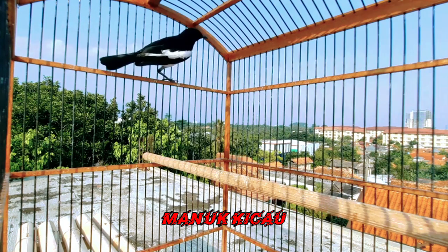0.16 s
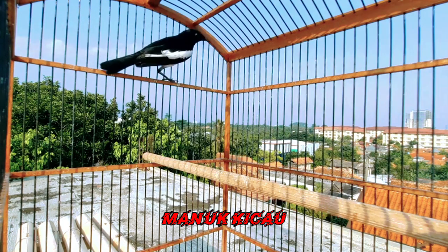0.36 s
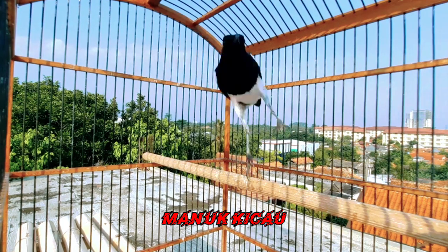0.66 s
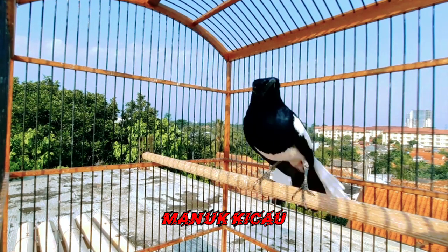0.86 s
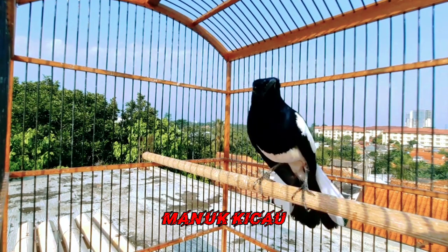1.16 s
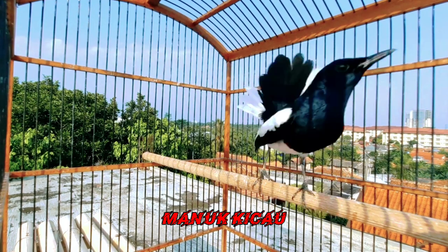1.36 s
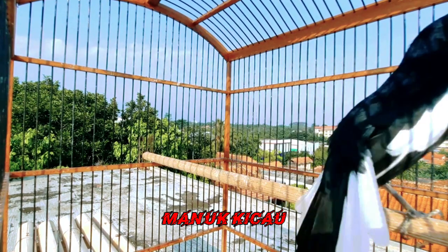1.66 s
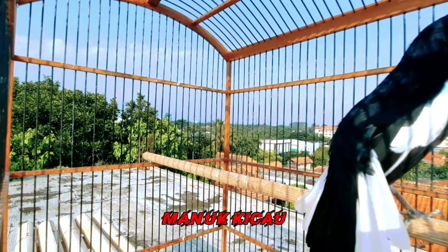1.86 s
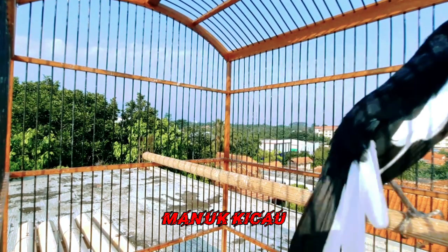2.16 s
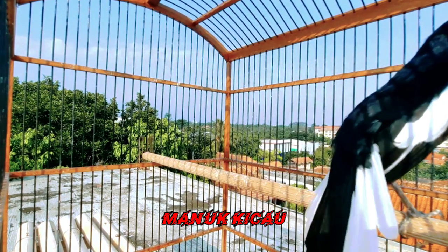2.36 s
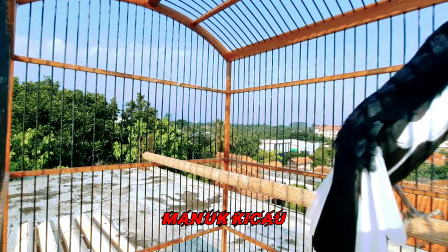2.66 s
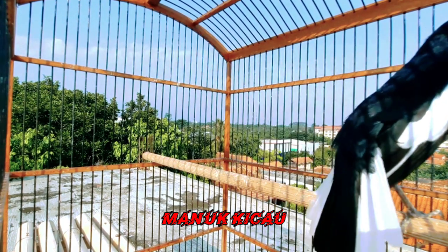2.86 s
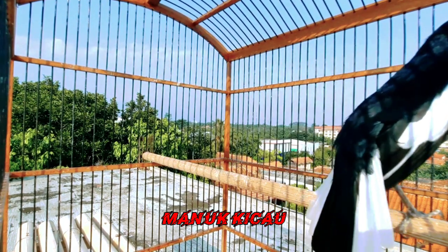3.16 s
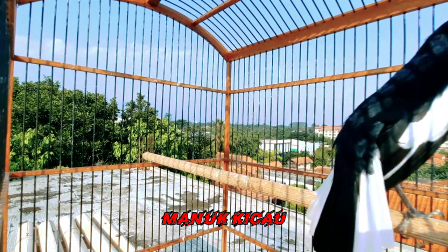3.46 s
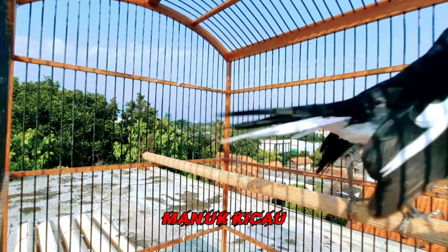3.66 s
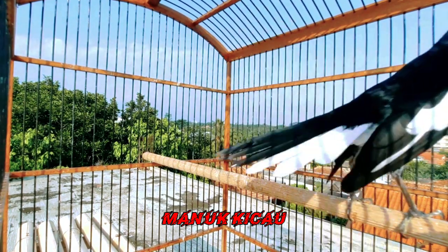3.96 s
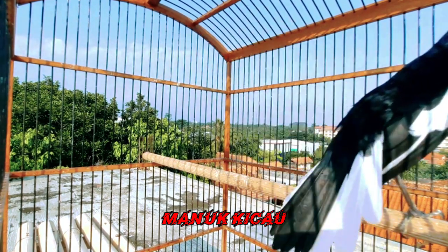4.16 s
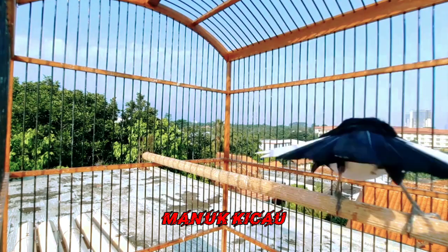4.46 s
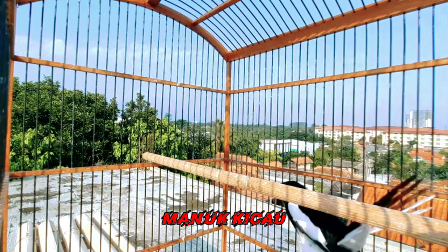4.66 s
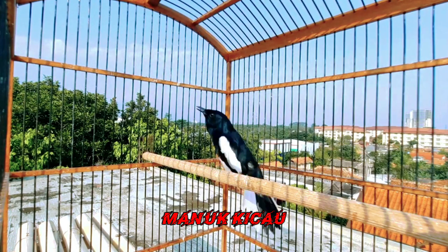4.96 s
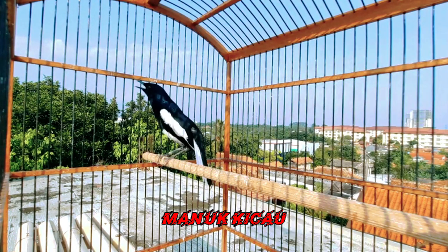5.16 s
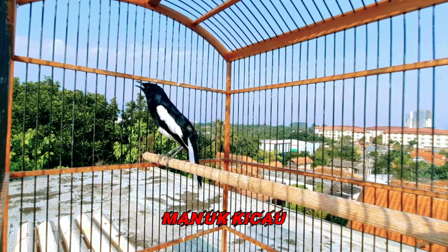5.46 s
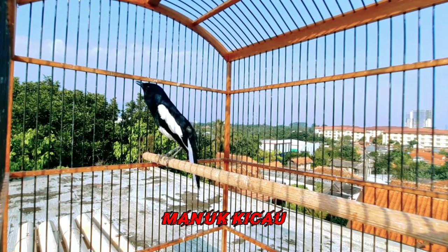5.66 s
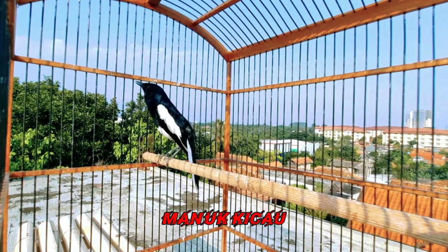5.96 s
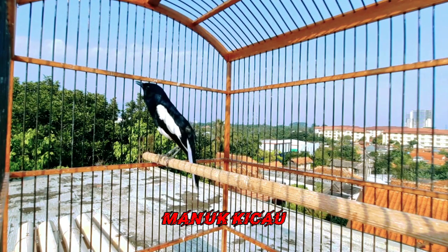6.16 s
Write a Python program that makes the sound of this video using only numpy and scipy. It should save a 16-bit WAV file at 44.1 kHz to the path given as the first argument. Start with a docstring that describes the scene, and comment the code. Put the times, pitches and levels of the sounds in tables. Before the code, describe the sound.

A small songbird in a cage sings very close to a stereo microphone on an open rooftop. A faint warble, dry ticks and wire rattle come first, then a harsh squeal trailing bright hiss and a perch thump. Chips, rasps and warbles follow; wind buffets the right side while distant birds call. Rising whistles lead into more rasps, another hop, twitters and arched whistles over low town rumble.

```python
"""A magpie-robin sings in a cage on a roof, so close that loud notes overload both ports; a town rumbles far off.
It opens with a warble, ticks and landing feet, then a squeal that leaves a hiss, another hop, whistles and rasps.
Warbles follow a first chip; a gust buffets the right port while faint birds call.
Upslurs then lead into rasps, with more chips and a hop, before twitters and a last run of arched whistles.
Song is near-sine tone with jitter and overtones; air is shaped noise; perch, wires and frame are damped modes."""
import sys
import numpy as np
from scipy import signal
from scipy.fft import rfft, irfft, next_fast_len
from scipy.io import wavfile
from scipy.ndimage import uniform_filter1d

SR = 44100
rng = np.random.default_rng(int(sys.argv[2]) if len(sys.argv) > 2 else 0)


def generate_wav(signal):
    """Clip the signal to [-1, 1] and save it as 16-bit WAV at the path in sys.argv[1]."""
    frames = np.transpose(np.atleast_2d(signal))
    scaled = np.clip(frames, -1, 1) * 32767
    pcm = np.round(scaled).astype(np.int16)
    wavfile.write(sys.argv[1], SR, pcm)


N = 278271
TIME = np.arange(N) / SR


def from_db(db):
    """Decibels to gain."""
    return 10 ** (np.asarray(db) / 20)


def unit(x):
    """Scales to an rms of one."""
    return x / np.sqrt(np.mean(x ** 2) + 1e-20)


def follow(rows, t):
    """Reads each column of a curve at the times t."""
    s, *columns = np.transpose(rows)
    return [np.interp(t, s, c) for c in columns]


def add(mix, s, sound):
    """Lays a sound into the mix at s seconds."""
    part = mix[..., max(round(s * SR), 0):][..., :sound.shape[-1]]
    part += sound[..., :part.shape[-1]]


def pan(left_db):
    """Gains of the two ports for a level difference, at equal mean power."""
    gains = from_db([[left_db / 2], [-left_db / 2]])
    return unit(gains)


def noise(spectrum, size=N):
    """Noise of unit rms, shaped by a spectrum of (hz, db) read along log frequency."""
    hz, db = np.transpose(spectrum)
    padded = next_fast_len(size, True)
    f = np.fft.rfftfreq(padded, 1 / SR)
    shape = from_db(np.interp(np.log(f + 1), np.log(hz), db))
    white = rfft(rng.standard_normal(padded))
    return unit(irfft(white * shape, padded)[:size])


def noise_pair(spectrum, shared):
    """Noise at both ports; shared is the part of the power common to both."""
    shared = np.clip(shared, 0, 1)
    common = noise(spectrum)
    separate = np.array([noise(spectrum), noise(spectrum)])
    return np.sqrt(shared) * common + np.sqrt(1 - shared) * separate


def wobble(size, rate_hz):
    """Smooth random drift of unit rms that moves at up to about rate_hz."""
    padded = next_fast_len(size, True)
    f = np.fft.rfftfreq(padded, 1 / SR)
    white = rfft(rng.standard_normal(padded))
    return unit(irfft(white / (1 + (f / rate_hz) ** 4), padded)[:size])


def echoes(x, t60, delay_s):
    """Scattered reflections, different at each port, that die away."""
    t = np.arange(SR // 2) / SR
    hits = rng.random((2, len(t))) < 2000 / SR  # about 2000 reflections a second
    taps = rng.standard_normal((2, len(t))) * hits
    taps *= from_db(-60 * t / t60) * (t > delay_s)
    taps /= np.linalg.norm(taps, axis=1, keepdims=True)
    return signal.fftconvolve(x, taps, axes=1)[:, :N]


def outdoors():
    """A gently swelling town rumble, and low, lumpy wind noise mostly on the right port."""
    # town rumble spectrum: hz, level_db
    town_spectrum = [(20, -26), (70, -3), (110, 0), (170, -7), (310, -7), (600, -28), (3000, -38),
                     (6500, -49), (10000, -72)]
    # wind strength before panning: time_s, level_db
    gust_level = [(0, -70), (1.7, -48), (2.25, -32.5), (2.8, -28), (3.0, -23), (3.36, -21), (3.6, -43.5),
                  (6.3, -44)]
    # wind buffeting spectrum: hz, level_db
    buffet_spectrum = [(25, -39), (55, -11.5), (102, 4), (140, -11), (310, -33), (450, -52), (2000, -110)]
    town_db, town_swell_db = -42, 1.4
    puff_s, puff_db, puff_length_s = 2.269, -11, 0.012  # one sharp puff in the wind

    gust_db, = follow(gust_level, TIME)
    puff = from_db(puff_db) * np.exp(-((TIME - puff_s) / puff_length_s) ** 2)
    strength = from_db(gust_db + 2.6 * wobble(N, 7.7)) + puff
    wind = noise(buffet_spectrum) * strength
    town = noise_pair(town_spectrum, 0.18) * from_db(town_db + town_swell_db * wobble(N, 8.5))
    return pan(-29.0) * wind + pan(1.1) * town


def steps(length):
    """Times through a note, from its start."""
    return np.linspace(0, length, 200)


def envelope(t, attack_s, release_s, depth_db):
    """Attack, hold and release, in dB under the held level."""
    rise = t / max(attack_s, 1e-4)
    fall = (t[-1] - t) / max(release_s, 1e-4)
    return depth_db * (np.minimum(rise, 1) + np.minimum(fall, 1) - 2)


def arch(start, length, first_hz, turn_hz, last_hz, turn_s, level_db, attack_s, release_s, depth_db):
    """Pitch bends to a turning point and away again. Like all notes: rows of (s, Hz, dB)."""
    bend = 1.6  # pitch leaves its turning point with this power of time
    t = steps(length)
    before = np.maximum(1 - t / turn_s, 0)
    after = np.maximum(t - turn_s, 0) / abs(length - turn_s)
    hz = turn_hz + (first_hz - turn_hz) * before ** bend + (last_hz - turn_hz) * after ** bend
    return np.c_[start + t, hz, level_db + envelope(t, attack_s, release_s, depth_db)]


def syllable(rows, lag_ms, jitter, shimmer, flutter_hz, half_db, octave_db, rush_db=None, fall_db=9,
             steady_holds=False, edge_s=.003):
    """The syrinx swings as a near sine; when strained it shakes and doubles its period, which adds half lines."""
    # air rushing through the beak: hz, level_db
    rush_spectrum = [(500, -9), (1500, -11.5), (5500, 1.5), (10000, -12), (15000, -3)]
    t = np.arange(rows[0][0] - edge_s / 2, rows[-1][0] + edge_s / 2, 1 / SR)
    hz, db = follow(rows, t)
    strain = 1
    if steady_holds:
        # fast glides (Hz a second) shake the voice; held stretches stay pure
        glide = uniform_filter1d(abs(np.gradient(hz, t)), size=300)
        strain = np.clip(glide / 25000, 0, 1)
    shaken_hz = hz * (1 + strain * jitter * wobble(len(t), flutter_hz))
    phase = 2 * np.pi * np.cumsum(shaken_hz) / SR
    # half the lag on each port, left behind right when positive
    phase = phase - np.pi * hz * lag_ms / 1000 * np.array([[1], [-1]])
    halves = np.sin(phase / 2) + np.sin(phase + phase / 2)
    # weak overtones, each fall_db under the last
    overtones = sum(from_db(-fall_db * (k - 2.5)) * np.sin(k * phase) * (k * hz < SR / 2)
                    for k in range(2, 7))
    tone = np.sin(phase) + from_db(half_db) * halves + from_db(octave_db) * overtones
    if rush_db is not None:
        # turbulent air comes in short spurts and grows with the tone
        rush = np.array([noise(rush_spectrum, len(t)), noise(rush_spectrum, len(t))])
        spurts = unit(np.exp(.5 * wobble(len(t), flutter_hz)))
        tone = tone + strain * from_db(rush_db) * rush * spurts
    to_edge_s = np.minimum(t - t[0], t[-1] - t)
    edges = np.sin(np.pi / 2 * np.clip(to_edge_s / edge_s, 0, 1)) ** 2
    flicker = np.exp(strain * shimmer * wobble(len(t), flutter_hz))
    return tone * from_db(db) * edges * flicker


def far_birds():
    """Thin whistles and one hoarse upward call, near sines panned left."""
    # thin calls, level before panning:
    # start_s, length_s, first_hz, turn_hz, last_hz, turn_after_s, level_db, attack_s, release_s
    thin_calls = [ (2.865, 0.13, 2470, 2630, 2546, 0.067, -42, 0.036, 0.042),
                  (2.92, 0.097, 3100, 3190, 3110, 0.041, -50.5, 0.026, .03),
                  (3.355, .19, 4480, 4070, 4015, 0.11, -29, 0.09, 0.087),
                  (3.466, 0.12, 2930, 2990, 2980, .06, -35, 0.046, 0.033),
                  (3.67, 0.11, 4720, 4500, 4630, 0.066, -47, 0.061, 0.07), ]
    # one faint, hoarse call, same columns
    hoarse_call = (2.04, .15, 2700, 4500, 4550, .14, -43, .06, .02)
    out = np.zeros((2, N))
    for row in thin_calls:
        note = arch(*row, depth_db=14.5)
        call = syllable(note, -0.051, jitter=.006, shimmer=0.29, flutter_hz=118.8,
                        half_db=-38.0, octave_db=-32, edge_s=0.021)
        add(out, row[0], call)
    note = arch(*hoarse_call, depth_db=13)
    call = syllable(note, -0.06, jitter=.08, shimmer=.4, flutter_hz=600,
                    half_db=-39, octave_db=-41.5, edge_s=0.054)
    add(out, hoarse_call[0], call)
    return out * pan(15)


def ring(modes, push_s):
    """Damped modes set going by a push that builds over push_s."""
    t = np.arange(SR // 2) / SR
    body = sum(from_db(db - 60 * t / t60) * np.sin(2 * np.pi * (hz * t + rng.random()))
               for hz, db, t60 in modes)
    return body * (1 - np.exp(-t / push_s))


def cage():
    """Feet scuff and knock the perch, ring the wires and shake the frame; wings push puffs of air."""
    # feet landing, each part before panning: time_s, perch_knock_db, wire_ring_db, frame_thud_db
    landings = [(.168, -65, -41, -76.5), (.181, -53, -37.5, -55), (0.847, -29.5, -61, -15),
                (4.833, -20.5, -68.5, -23)]
    # modes of the wooden perch: hz, level_db, t60_s
    perch_modes = [(549, 8, 0.13), (1066, -24, 0.086)]
    # modes of the cage wires: hz, level_db, t60_s
    wire_modes = [(2370, 3, 0.17), (3570, -5, .33), (7160, -15, 0.34)]
    # modes of the cage frame: hz, level_db, t60_s
    frame_modes = [(76.5, 0, 0.18), (103, 6.5, 0.13)]
    # wing strokes, level before panning: centre_s, level_db, bell_width_s
    wing_strokes = [(0.197, -32.5, 0.014), (0.694, -21, 0.017), (0.85, -27, 0.023), (4.724, -38.5, 0.03)]
    # air pushed by a wing, also the colour of the foot scuff: hz, level_db
    wing_air = [(60, -22), (200, -11), (380, -2.5), (560, -4.5), (800, -26.5), (1250, -15), (2200, -29),
                (8000, -47)]

    feet = np.zeros(N)
    for s, perch_db, wire_db, thud_db in landings:
        wood = ring(perch_modes, 0.0019)
        scuff = .5 * noise(wing_air, len(wood)) * np.exp(-TIME[:len(wood)] / 0.027)
        wires = from_db(wire_db) * ring(wire_modes, 0.00027)
        thud = from_db(thud_db) * ring(frame_modes, 0.0047)
        add(feet, s, from_db(perch_db) * (wood + scuff) + wires + thud)
    strokes = sum(from_db(db) * np.exp(-((TIME - s) / width) ** 2 / 2) for s, db, width in wing_strokes)
    return pan(22) * (feet + strokes * noise(wing_air))


def hiss():
    """A bright noise lingers after the squeal, in drifting narrow streaks; its treble fades faster."""
    # strength before streaks, dulling and panning: time_s, level_db
    hiss_level = [(.56, -100), (.62, -27), (.76, -25.5), (1.05, -32.5), (1.5, -42.5), (1.65, -48),
                  (1.9, -110)]
    # spectrum before streaks and dulling: hz, level_db
    hiss_spectrum = [(900, -28.5), (2900, -14.5), (3500, -1), (4400, -8.5), (5600, -3), (7300, -17),
                     (10000, -22.5), (14800, -19.5), (15500, -45.5)]
    level_db, = follow(hiss_level, TIME)
    hz, t, z = signal.stft(noise_pair(hiss_spectrum, .3), SR, nperseg=512)
    # random gains smoothed a little across pitch and longer along time
    grain = uniform_filter1d(rng.standard_normal(z.shape[1:]), size=3, axis=0)
    streaks = unit(uniform_filter1d(grain, size=24, axis=1))
    # over one second the top of the spectrum sinks
    dulling = hz[:, None] / hz[-1] * np.clip(t - hiss_level[2][0], 0, 1)
    streaked = signal.istft(z * from_db(3 * streaks - 5.5 * dulling), SR, nperseg=512)[1][:, :N]
    return pan(6) * streaked * from_db(level_db)


def ticks():
    """Dry broadband ticks around the end of the first warble: white noise in bells a few ms long."""
    # sharp ticks: centre_s, level_db
    tick_list = [(.1247, -31.5), (0.1337, -22)]
    bursts = sum(from_db(db) * np.exp(-((TIME - s) / 0.002) ** 2) for s, db in tick_list)
    return bursts * rng.standard_normal((2, N))


def sing(syllables, gain_db, **voice):
    """Syllables of one kind, each from where the beak is at that moment."""
    # where the beak is: time_s, left_port_lag_ms, left_minus_right_db
    beak_path = [(.11, -0.068, 2.5), (.6, -0.05, 3.5), (1.2, .07, 3), (1.65, 0.31, -2), (2.53, .36, -4.5),
                 (3.87, 0.3, 13), (3.95, 0.4, -1.5), (4.475, 0.26, 10), (4.52, 0.16, 4), (4.68, 0.446, -4),
                 (4.93, 0.095, 3), (5.24, -0.08, 7), (5.75, -.14, 4.5), (6.29, -0.053, 3.5)]
    out = np.zeros((2, N))
    for rows in syllables:
        middle_s = (rows[0][0] + rows[-1][0]) / 2
        lag_ms, left_db = follow(beak_path, middle_s)
        add(out, rows[0][0], pan(left_db) * syllable(rows, lag_ms, **voice))
    return from_db(gain_db) * out


def upslur(start, length, level_db):
    """Pitch climbs in an S and levels off."""
    low_hz, high_hz, rise_s = 2158, 3660, .14
    t = steps(length)
    climb = np.sin(np.pi / 2 * np.minimum(t / rise_s, 1)) ** 2
    hz = low_hz + (high_hz - low_hz) * climb
    return np.c_[start + t, hz, level_db + envelope(t, attack_s=.045, release_s=.02, depth_db=20)]


def lead_ins():
    """Soft, fluttering upslurs whose echoes hang in the air under the rasps."""
    # rising whistles that lead into a rasp: start_s, length_s, level_db (before panning)
    upslur_notes = [(3.781, .187, -16.5), (4.381, 0.176, -20.5)]
    slurs = sing([upslur(*row) for row in upslur_notes], gain_db=0, jitter=0.0083, shimmer=.35,
                 flutter_hz=70, half_db=-71.5, octave_db=-51.5)
    return slurs + from_db(-14) * echoes(slurs, t60=.6, delay_s=.008)


def warble(start, length, centre_hz, dip_s, period_s, level_db, attack_s, release_s):
    """Pitch swings evenly about its centre."""
    depth = .1  # share of the pitch
    t = steps(length)
    hz = centre_hz * (1 - depth * np.cos(2 * np.pi * (t - dip_s) / period_s))
    return np.c_[start + t, hz, level_db + envelope(t, attack_s, release_s, depth_db=24)]


def squeak(start, length, hz, level_db, attack_s):
    """One pitch, briefly held."""
    t = steps(length)
    level = level_db + envelope(t, attack_s, release_s=.008, depth_db=24)
    return np.c_[start + t, np.full(len(t), hz), level]


def twitter(start, length, top_hz, level_db):
    """A small arch, loudest as it comes down."""
    first, last, turn = .9, 0.863, 0.35  # end pitches as shares of the top; where the top lies
    return arch(start, length, first * top_hz, top_hz, last * top_hz, turn * length, level_db,
                attack_s=0.022, release_s=0.0037, depth_db=17.5)


def robin_high():
    """Squeal, squeaks and twitters: strained tones with half lines, sung further back in the cage."""
    # levels are before the gain_db of each kind and panning
    # one harsh, high warble:
    # start_s, length_s, centre_hz, first_dip_after_s, period_s, level_db, attack_s, release_s
    squeal_note = (.582, .048, 4080, .006, 0.016, 4.4, 0.003, 0.01408)
    # harsh squeaks around the squeal and the twitters:
    # start_s, length_s, pitch_hz, level_db, attack_s, half_lines_db
    squeak_notes = [(0.557, 0.031, 5200, -2.5, 0.02, -4.5), (0.629, 0.026, 4430, -11, 0.0025, -11.5),
                    (5.232, 0.036, 4445, -15, 0.013, -31), (5.343, 0.021, 4220, -15, 0.0018, -34),
                    (5.447, 0.024, 4250, -18, 0.0045, -33), (5.56, .025, 5150, -27, 0.013, -26.5)]
    # quick arches that swell: start_s, length_s, top_hz, level_db, overtones_db
    twitter_notes = [(5.211, 0.027, 3170, 1, -40), (5.314, .035, 3272, -9, -18.5),
                     (5.415, .032, 3200, -8.5, -34.5), (5.523, 0.04, 3198, -8, -35)]

    squeaking = sum(sing([squeak(*row)], gain_db=-0.5, jitter=.025, shimmer=0.348, flutter_hz=450,
                         half_db=half_db, octave_db=-38, rush_db=-19, edge_s=.006)
                    for *row, half_db in squeak_notes)
    twittering = sum(sing([twitter(*row)], gain_db=0.5, jitter=0.011, shimmer=0.27, flutter_hz=302,
                          half_db=-48.5, octave_db=octave_db, rush_db=-34, fall_db=19)
                     for *row, octave_db in twitter_notes)
    squealing = sing([warble(*squeal_note)], gain_db=-2, jitter=.016, shimmer=0.37, flutter_hz=304.2,
                     half_db=-11.5, octave_db=-23, rush_db=-22.5)
    return squeaking + twittering + squealing


def chip(s, length, flick_db, held_db):
    """A soft high lead flicks down, then steps up to a held note that sags and fades."""
    lead_hz, low_hz, held_hz, sag_hz_per_s = 4400, 3160, 3531, 3500
    lead_s, flick_s, step_s, lead_db = .016, .014, 0.0037, -23  # lead_db is relative to the flick
    t = steps(lead_s + length) - lead_s
    corners = [-step_s, step_s / 2, flick_s, flick_s + step_s]
    hz = np.interp(t, corners, [lead_hz, held_hz, low_hz, held_hz])
    db = np.interp(t, corners, [flick_db + lead_db, flick_db, flick_db, held_db])
    sag = sag_hz_per_s * np.maximum(t - flick_s, 0)
    level = db + envelope(t + lead_s, attack_s=.006, release_s=.016, depth_db=26)
    return np.c_[s + t, hz - sag, level]


def rasp(start, length, ratio, level_db, attack_s, release_s, second_db):
    """Two notes: one side of the syrinx tumbles down; the other joins halfway and holds its pitch."""
    # tumbling pitch before each rasp's ratio: share_of_length, pitch_hz
    rasp_fall = [(0, 2538), (.15, 2761), (.35, 2062), (.45, 2469), (.6, 1920), (.75, 1958), (1, 1445)]
    second_hz, second_from, second_to = 2598, .5, 1.146  # from and to are shares of the length
    t, held = steps(length), steps(length * (second_to - second_from))
    hz, = follow(rasp_fall, t / length)
    first_level = level_db + envelope(t, attack_s, release_s, depth_db=17)
    second_level = second_db + envelope(held, attack_s=.002, release_s=0.02, depth_db=23.5)
    return [np.c_[start + t, ratio * hz, first_level],
            np.c_[start + length * second_from + held, np.full(len(held), second_hz), second_level]]


def robin():
    """Whistles, chips, warbles and rasps, from pure tone to harsh half lines and rushing air."""
    # levels are before the gain_db of each kind and panning
    # arched whistles; the one near 15 kHz is a thin overtone above a long note:
    # start_s, length_s, first_hz, turn_hz, last_hz, turn_after_s, level_db, attack_s, release_s
    whistle_notes = [ (1.119, 0.15, 1370, 2020, 1466, 0.051, -10, 0.009, 0.022),
                     (1.133, 0.1, 940, 1074, 970, 0.054, -19, 0.0087, 0.042),
                     (4.029, 0.077, 2130, 2273, 2515, .02, -18.5, 0.072, .003),
                     (4.57, 0.16, 2780, 2230, 2395, 0.074, -35.5, .002, 0.0066),
                     (5.104, 0.044, 2700, 2926, 2760, 0.007, -7.5, 0.0037, 0.013),
                     (5.634, 0.057, 2340, 2474, 2460, .025, -19, .018, .02),
                     (5.693, .153, 2490, 2642, 2380, .125, -6.5, 0.092, 0.0095),
                     (5.659, .16, 14850, 15520, 15450, .11, -39, 0.031, .04),
                     (5.838, 0.026, 2460, 2346, 1577, .004, 2, .008, 0.015),
                     (5.899, .073, 1770, 2097, 1345, 0.0436, -11, 0.022, 0.006),
                     (6.042, 0.049, 3230, 3380, 1888, 0.015, -15, 0.024, 0.0031),
                     (6.262, 0.046, 1300, 2312, 2370, .034, -4, 0.03, 0.0017), ]
    # chips: downward_flick_s, length_from_flick_s, flick_db, held_note_db
    chip_notes = [(1.772, 0.056, 3.5, 4.5), (4.09, 0.062, 0, 5.5), (4.652, 0.059, 1, -0.5)]
    # rasps: start_s, length_s, pitch_ratio, level_db, attack_s, release_s, second_voice_db
    rasp_notes = [ (1.61, 0.085, 0.97, 3, 0.029, 0.023, -10), (2.173, 0.085, 1, -0.5, .017, 0.023, -3),
                  (3.911, 0.087, 0.99, 1.5, 0.022, 0.029, -4.5),
                  (4.472, .095, 0.98, -1.5, .028, 0.02, -13.5), (4.89, 0.088, .96, -3, 0.031, 0.018, -23), ]
    # warbles: start_s, length_s, centre_hz, first_dip_after_s, period_s, level_db, attack_s, release_s,
    # pitch_jitter_share, half_lines_db
    warble_notes = [ (0.086, 0.045, 4280, 0.024, 0.03, -20, 0.0048, 0.0053, 0.0046, -54),
                    (0.649, 0.046, 3050, 0.0058, 0.018, -10.5, 0.0032, 0.015, .02, -32.5),
                    (2.323, .094, 2598, 0.029, 0.025, 5, 0.024, 0.027, .045, -37.5),
                    (2.482, .094, 2671, 0.035, .042, 4, 0.027, 0.028, 0.017, -36.5),
                    (5.043, 0.062, 2486, .04, 0.042, -4, 0.022, 0.0086, 0.0696, -27), ]

    warbling = sum(sing([warble(*row)], gain_db=0.87, jitter=jitter, shimmer=0.38, flutter_hz=399,
                        half_db=half_db, octave_db=-40, rush_db=-29, steady_holds=True, edge_s=.005)
                   for *row, jitter, half_db in warble_notes)
    whistling = sing([arch(*row, depth_db=23) for row in whistle_notes], gain_db=2.0, jitter=0.0054,
                     shimmer=.1, flutter_hz=105, half_db=-75, octave_db=-47.5, rush_db=-60.5, fall_db=2.5)
    chipping = sing([chip(*row) for row in chip_notes], gain_db=1.7, jitter=0.018, shimmer=0.32,
                    flutter_hz=400, half_db=-53.5, octave_db=-44.5, rush_db=-29.5, steady_holds=True)
    rasping = sing([note for row in rasp_notes for note in rasp(*row)], gain_db=2.0, jitter=0.045,
                   shimmer=0.38, flutter_hz=483, half_db=-24.5, octave_db=-43.5, rush_db=-25.5, edge_s=.009)
    return warbling + whistling + chipping + rasping


def scene():
    """The robin with quick echoes off cage and roof, wetter when further back; far birds with a longer tail."""
    high, far = robin_high(), far_birds()
    song = robin() + high
    near_echo = from_db(-9.5) * echoes(song, t60=0.057, delay_s=.004)
    wide_send = from_db(-42.5) * song + from_db(-25.5) * high
    wide_echo = echoes(wide_send, t60=0.19, delay_s=.015)
    far_echo = from_db(-4.5) * echoes(far, t60=0.17, delay_s=0.017)
    background = outdoors() + far + far_echo + cage() + hiss() + ticks()
    return background + lead_ins() + song + near_echo + wide_echo


def record(dry):
    """Each port saturates with a tight knee at full scale; then a low-pass limits the band."""
    knee, cutoff_hz = 8, 15600
    fine = signal.resample_poly(dry, 2, 1, axis=1)  # double rate, so clipping folds back less
    saturated = fine / (1 + abs(fine) ** knee) ** (1 / knee)
    clipped = signal.resample_poly(saturated, 1, 2, axis=1)
    low_pass = signal.firwin(255, cutoff_hz, window=("kaiser", 7), fs=SR)
    return signal.oaconvolve(clipped, low_pass[None], "same")


dry = scene()
out = record(dry)
generate_wav(out)
```